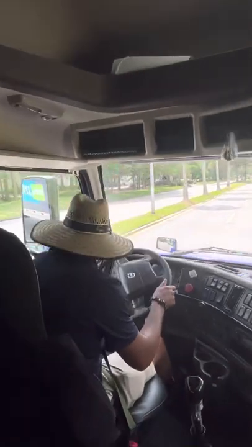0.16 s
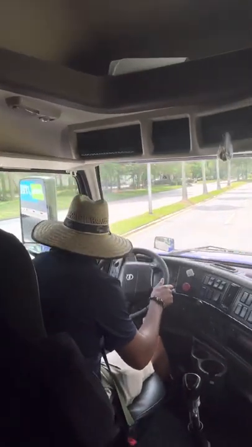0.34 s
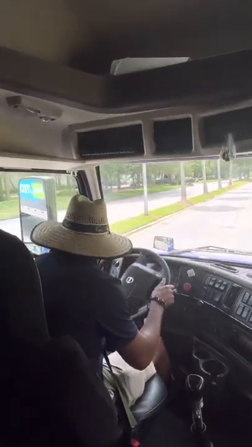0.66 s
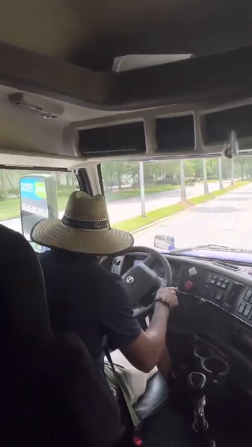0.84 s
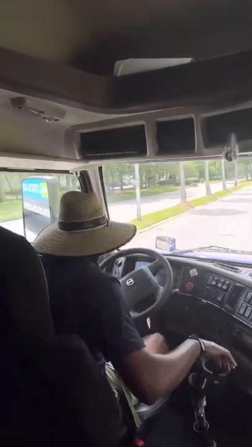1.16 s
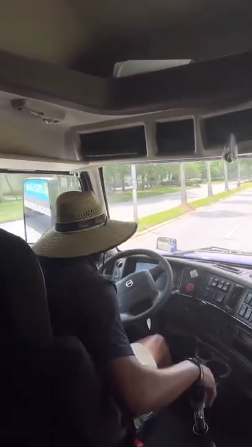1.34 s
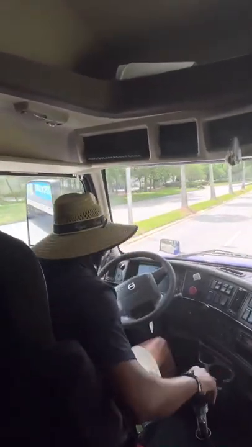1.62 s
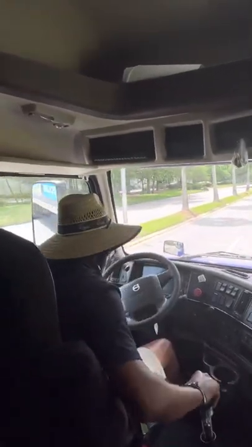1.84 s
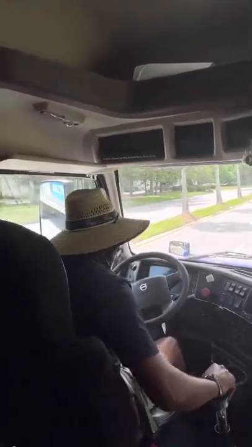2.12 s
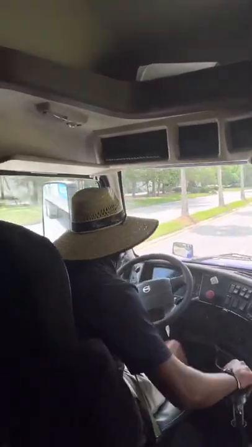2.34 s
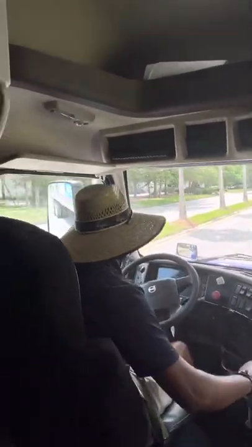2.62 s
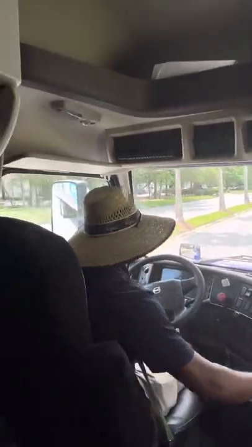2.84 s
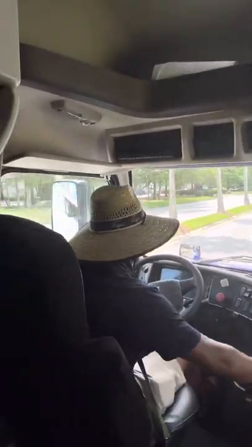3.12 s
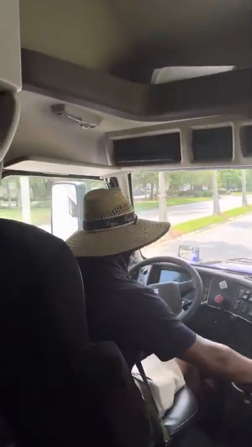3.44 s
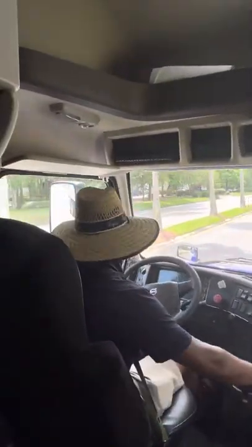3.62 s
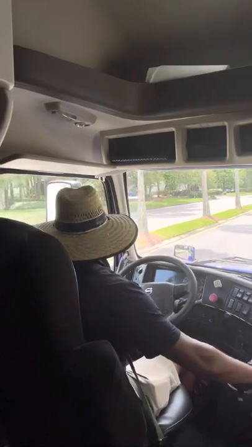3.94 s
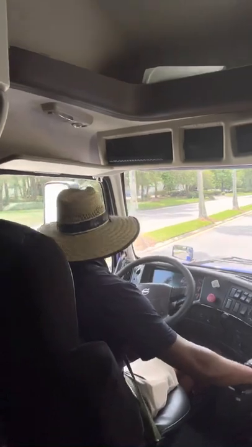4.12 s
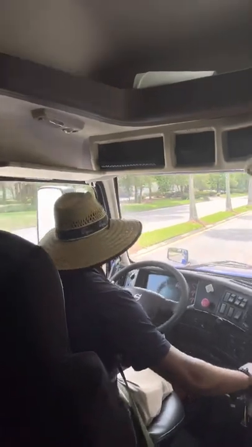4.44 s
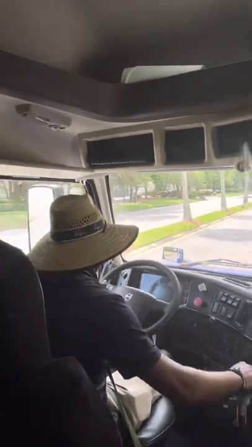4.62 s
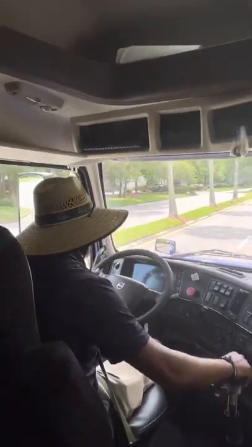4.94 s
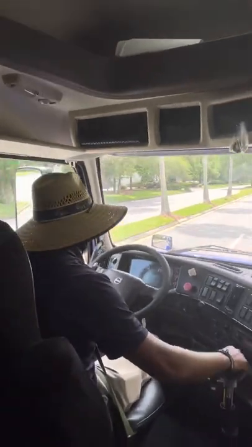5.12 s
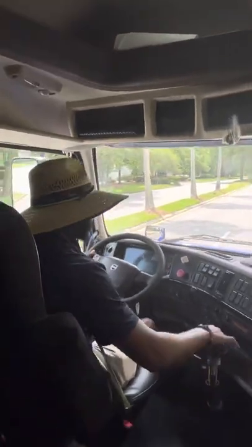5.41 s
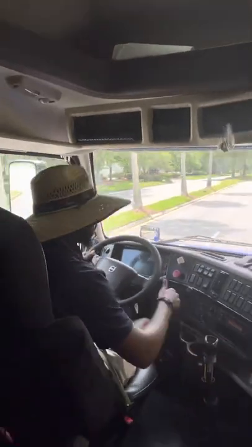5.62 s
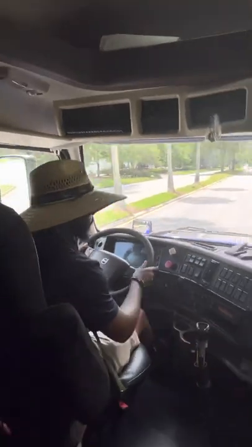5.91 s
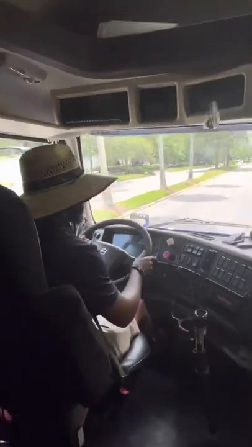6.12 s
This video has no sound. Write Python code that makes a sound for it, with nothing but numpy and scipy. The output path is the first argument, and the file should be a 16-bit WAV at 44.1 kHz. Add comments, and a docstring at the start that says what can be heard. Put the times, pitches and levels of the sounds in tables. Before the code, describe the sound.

Inside the cab of a slowly rolling heavy truck, heard from behind the driver's seat, a diesel engine drones and clatters. A turn indicator ticks lightly about three times a second throughout, over road rumble and faint blower hiss. For the first 2 seconds the engine pulls and rises gently in pitch, with thin gear whines. It then sinks, reaching idle around 3.5 seconds. The gear lever knocks dully at about 1.2, 1.5, 2.1 and 3 seconds, then several times between 3.8 and 4.5. Trim squeaks briefly at 2.6 and 3.7 seconds and rattles around 3, where keys clink faintly. From 5 seconds the engine picks up, the clutch biting with a low shudder near 5.4, with another small rattle and clink. The tyres hum on and off, and bumps make the cab boom softly, most clearly near 1, 2.9 and 5.3 seconds.

```python
"""Inside the cab of a slowly rolling heavy truck. The six-cylinder diesel pulls, drops to idle for a
gear change and picks up again as the clutch bites with a shudder. Its firings make a throbbing drone
and a clatter. Behind it the tyres hum, the cab booms over bumps, the blower hisses and the gears whine.
The turn indicator's relay ticks, the gear lever knocks, keys clink and the trim rattles and squeaks."""
import sys
import numpy as np
from scipy import signal
from scipy.fft import rfft, irfft, next_fast_len
from scipy.io import wavfile
from scipy.ndimage import uniform_filter1d, map_coordinates

SR = 44100
rng = np.random.default_rng(int(sys.argv[2]) if len(sys.argv) > 2 else 0)


def unload_audio(sound):
    """Save the sound as a 16-bit wav file, at the path given as the first command line argument."""
    columns = np.transpose(np.atleast_2d(sound))
    # keep every value between -1 and 1, then stretch to whole-number steps
    steps = np.round(np.clip(columns, -1, 1) * 32767)
    wavfile.write(sys.argv[1], SR, steps.astype(np.int16))


N = 276507

# "Mid" is what both ears share; "side" is how they differ, which makes a sound wide.
# How closely the side of a noise follows its mid: pitch_hz, share
EAR_LINK = [(40, 0.23), (130, 0.82), (300, 0.92), (600, 0.24), (2000, 0.27), (10000, 0.12)]

# Noise colours (how strong a noise is from low to high), each with: pitch_hz, level_db
HISS_MID = [(3800, -46), (4800, 3.5), (5600, 8.5), (6800, 6), (8000, 1), (9100, -2), (9600, -27.5),
            (10300, 4.5), (11200, 0.5), (11900, -25.5), (12800, -97)]  # air from the blower
HISS_SIDE = [(3800, -28), (4800, 4), (6000, -7), (7000, -1.5), (8500, 5), (9600, 3), (10600, 6.5),
             (11300, -18), (12000, -47)]
BOOM = [(22, -15), (35, -8.5), (55, 1), (80, 0.5), (120, -15), (220, -24.5)]  # the cab's deep boom
RUMBLE_MID = [(60, -33), (100, 4), (145, 2), (180, 0), (260, -1.5), (380, -9), (430, -14.5), (490, -13.5),
              (600, -42)]  # the cab shell shaking
RUMBLE_SIDE = [(50, -15), (100, 0.5), (145, 4.5), (200, 3), (300, 7.5), (420, -6), (600, -23), (900, -36)]
TRIM = [(150, -28), (300, 3), (480, -26), (1000, 4), (2200, 4), (3500, -13), (7000, -34)]  # the body of a rattle
SIZZLE = [(2000, -65), (4000, 8.5), (6500, 11.5), (9000, 5), (11500, 10), (12600, -11), (14000, -26)]  # the bright edge of a rattle or squeak
CLACK = [(1050, -19), (1300, -9.5), (2000, -8), (2700, 3), (3200, -9.5), (4400, 0.5), (4800, -21)]  # the relay's moving arm
GROWL = [(400, -11), (500, -1), (620, -4), (760, 2.5), (900, -22)]  # the engine under load
CLATTER_MID = [(280, 0.5), (450, -10), (530, 0), (630, -8), (700, -4.5), (790, -3.5), (910, 1.5),
               (1120, -2), (1380, -0.5), (1700, -2.5), (2050, -5), (2600, -7), (3200, -12.5), (4400, -15),
               (5000, -62)]  # burning fuel and valves
CLATTER_SIDE = [(280, -22), (430, 0), (540, -5), (660, -1.5), (730, -9), (900, -7), (1130, -11),
                (1400, -22.5), (1770, -18), (2200, -20), (2650, -16), (3200, -26), (4050, -27), (5000, -51)]

# Tyre hum: time_s, pitch_hz, level_db
TYRE_HUM = [(1.9, 138, -60), (2.2, 138, -41), (2.7, 138, -40), (2.85, 135, -32), (3.1, 136, -39),
            (3.3, 135, -56), (4.3, 132, -56), (4.5, 132, -43), (5.1, 133, -43), (5.45, 136, -39),
            (5.9, 141, -41), (6.27, 141, -50)]
# How rough the road is: time_s, roughness_db
ROUGHNESS = [(0, 14.5), (1.3, -15), (2.3, 1), (2.95, 4.5), (3.4, -3), (4.3, -10), (4.7, -5), (5.35, 1.5),
             (6.27, -4)]
# Bumps in the road: start_s, length_s, level_db
BUMPS = [(0.944, 0.11, -28.5), (1.13, 0.14, -36), (1.67, 0.17, -39), (2.093, 0.1, -31), (2.74, 0.34, -31),
         (4.121, 0.12, -31.5), (5.277, 0.21, -27.5), (5.65, 0.099, -29.5), (5.857, 0.075, -29)]
# Gear whines: start_s, end_s, pitch_hz, level_db, side_db, waver_rad
WHINES = [(0, .72, 545, -55, 6, 1), (0, .6, 885, -56, 6, .7), (0, .36, 1215, -58, 8, .6),
          (1.3, 2.95, 528, -59.5, 23, .2), (1.38, 1.8, 1435, -52, 2, 1.8),
          (1.678, 1.88, 1035, -53, 11, 1.8)]
# Trim squeaks: start_s, pitch_hz, length_s, relative_db, lowest_tone_db
SQUEAKS = [(2.626, 4640, 0.043, -36.5, -1), (2.668, 5620, 0.028, -38, -12), (3.622, 4560, 0.027, -48, -4),
           (3.688, 4610, 0.038, -40.5, -10)]
# A squeak's higher tones: pitch_multiple, level_db
SQUEAK_OVERTONES = [(2, -1.5), (3, -28)]
# Keys touching: start_s, level_db
CLINKS = [(3.047, -42), (3.071, -40), (5.339, -45), (5.574, -48)]
# The tones the keys ring with: pitch_hz, mid_db, side_db
KEY_TONES = [(5351, -4, -5), (6500, -5, -6), (7246, -5, -4), (10300, -2, -2), (11290, 0, 0),
             (11890, -6, -10)]
# Gear lever knocks, duller when the contact is soft: start_s, relative_db, cutoff_hz
KNOCKS = [(1.216, -17.5, 1100), (1.534, -19, 1000), (1.549, -19, 700), (1.562, -27, 330), (2.116, -19, 606),
          (2.145, -21, 450), (3.026, -20.5, 1000), (3.039, -17.5, 507), (3.849, -23.5, 586),
          (3.975, -22.5, 510), (4.169, -28.5, 495), (4.182, -21, 1190), (4.192, -23, 1200),
          (4.212, -20, 296), (4.471, -15.5, 610), (4.495, -20.5, 800)]
# Trim rattles: start_s, relative_body_db, relative_sizzle_db, fade_s
RATTLES = [(2.783, -24.5, -49, 0.12), (2.807, -25.5, -52, 0.046), (2.981, -36, -48, .07),
           (3.001, -26, -45, 0.07), (3.022, -19, -37.5, 0.1), (3.046, -23, -39.5, 0.17),
           (3.071, -27, -40, 0.13), (3.689, -32, -41.5, 0.036), (5.338, -39, -41, 0.051),
           (5.347, -32, -40, 0.1)]
# Resonances (pitches at which a thing likes to ring): pitch_hz, width_hz, level_db
LEVER = [(130, 55, 4), (205, 76, 2), (314, 85, 0), (494, 194, -8), (720, 300, -13)]  # the gear lever
PANEL = [(467, 69, -4.5), (552, 54, -6.5), (690, 33, -14), (1013, 96, -7.5)]  # a hollow panel behind the trim
# The tones of the indicator relay: pitch_hz, mid_db, side_db
RELAY_CLOSING = [(1300, -27, -29), (1920, -28, -31), (2320, -35, -32), (2410, -35, -29), (2640, -35, -31),
                 (3660, -43, -40), (4205, -39, -40), (4280, -37.5, -38.5)]
RELAY_OPENING = [(2290, -35.5, -29), (2400, -32, -33.5), (2485, -33.5, -28), (2710, -33, -29.5),
                 (2890, -33.5, -31.5), (3620, -41.5, -40.5), (4200, -40.5, -45), (4570, -58, -47),
                 (5000, -58, -47)]
# The relay arm's hit and rebound: delay_s, level_db
BOUNCES = [(0, 0), (.013, -5)]

# Engine speed, where six firings make one cycle: time_s, firing_hz
ENGINE_SPEED = [(0, 68.3), (.4, 69.3), (.8, 75), (1.25, 78.6), (1.85, 83.3), (2.03, 83.3), (2.4, 67.5),
                (3, 47.5), (3.35, 39.5), (3.75, 35), (4.45, 39.7), (5.05, 39.7), (5.25, 56.5), (5.55, 55),
                (5.95, 63.5), (6.27, 66)]
# How hard the engine works: time_s, effort_db
EFFORT = [(0, 1), (.35, -3.5), (.7, -1), (1.95, -1.5), (2.5, -7.5), (2.95, -3.5), (3.3, -18.5), (4.3, -12),
          (5.05, -4.5), (5.5, -7.5), (6.27, -8.5)]
# The firing note and the note a fifth above it: time_s, level_db
FIRING_LEVEL = [(0, -49), (2.7, -49), (3.1, -42), (3.6, -46), (4.3, -43), (4.7, -57), (5.25, -56),
                (5.6, -41), (5.85, -39), (6.27, -54)]
FIFTH_LEVEL = [(0, -45), (.7, -47), (1.3, -39), (1.92, -33), (2.15, -43), (2.42, -37), (2.8, -43),
               (3.3, -58), (5.4, -54), (5.8, -44), (6.27, -45)]
# The exhaust's low tones, the sixth multiple being the firing rate: cycle_multiple, relative_db
EXHAUST_TONES = [(8, -5), (10, 0), (11, -4), (12, 0), (13, -3)]
# How loud an exhaust tone is as it slides through the cab's resonances: pitch_hz, level_db
CAB_RESPONSE = [(45, -58), (56, -46), (70, -48), (80, -40), (100, -42), (112, -44), (126, -38), (138, -37),
                (148, -34), (156, -42), (166, -49), (225, -47), (330, -59)]


def amp(db):
    """Turn decibels into a number to multiply by."""
    return 10 ** (np.asarray(db) / 20)


def unit(x):
    """Scale a sound to an average strength (rms) of 1."""
    return x / np.sqrt(np.mean(x ** 2) + 1e-20)


def along(points, hz):
    """Read between a table's rows on a musical (log) pitch scale."""
    pitches, values = np.transpose(points)
    return np.interp(np.log(hz + 1), np.log(pitches + 1), values)


def colour(points):
    """A filter that follows a noise colour and falls steeply beyond its ends."""
    def gain(hz):
        low_cut = np.minimum(hz / points[0][0], 1) ** 2
        return amp(along(points, hz)) * low_cut / np.maximum(hz / points[-1][0], 1) ** 6
    return gain


def body(resonances, cutoff_hz):
    """A filter for a ringing object, hit softly enough to lose the treble above cutoff_hz."""
    def gain(hz):
        peaks = sum((-1) ** k * amp(db) * 1j * hz * width / (pitch ** 2 - hz ** 2 + 1j * hz * width)
                    for k, (pitch, width, db) in enumerate(resonances))
        return peaks / (1 + (hz / cutoff_hz) ** 6)
    return gain


def curves(rows):
    """Turn each column after the time into one value per sample."""
    times, *columns = np.transpose(rows)
    return [np.interp(np.arange(N) / SR, times, column) for column in columns]


def wobble(rate):
    """A smooth random curve through `rate` points a second."""
    return map_coordinates(rng.standard_normal(int(N * rate / SR) + 4), [np.arange(N) * rate / SR])


def arch(start_s, length_s):
    """One smooth swell and fade."""
    return np.sin(np.pi * np.clip((np.arange(N) / SR - start_s) / length_s, 0, 1))


def octaves():
    """Engine speed in octaves above 50 firings a second."""
    firing_hz, = curves(ENGINE_SPEED)
    return np.log2(firing_hz / 50)


def filtered(x, response):
    """Pass a sound through a filter, given as a gain for each frequency."""
    n = x.shape[-1]
    padded = next_fast_len(n + SR // 4)
    return irfft(rfft(x, padded) * response(np.fft.rfftfreq(padded, 1 / SR)), padded)[..., :n]


def add(track, start_s, sound):
    """Mix a sound into a track."""
    part = track[..., max(round(start_s * SR), 0):][..., :sound.shape[-1]]
    part += sound[..., :part.shape[-1]]


def ears(mid, side):
    """Make left and right from mid and side."""
    return np.array([mid + side, mid - side])


def patchy(x, depth_db):
    """Give a sound brief swells and dips that differ from low to high."""
    bands = signal.stft(x, nperseg=1024)[2]
    swells = uniform_filter1d(rng.standard_normal(bands.shape[1:]), size=3, axis=0)
    swells = unit(uniform_filter1d(swells, size=6, axis=1))
    return unit(signal.istft(bands * amp(depth_db * swells), nperseg=1024)[1][:, :N])


def rush(mid_colour, side_colour, side_db, patchy_db, lag=2.22):
    """Noise in the cab; its low end reaches the right ear earlier and louder."""
    mid, other = patchy(rng.standard_normal((2, N)), patchy_db)
    link = lambda hz: np.clip(along(EAR_LINK, hz), 0, 1)
    linked = filtered(mid, lambda hz: link(hz) * np.exp(-1j * lag))
    free = filtered(other, lambda hz: np.sqrt(1 - link(hz) ** 2))
    side = unit(filtered(linked + free, colour(side_colour)))
    return ears(unit(filtered(mid, colour(mid_colour))), amp(side_db) * side)


def tone(phase, side_db, lag=2.17):
    """A pure tone standing between the cab walls, different at each ear."""
    return np.sqrt(2) * ears(np.sin(phase), amp(side_db) * np.sin(phase - lag))


def whine(hz, side_db, waver):
    """A thin, slightly unsteady tone."""
    flutter = amp(2.5 * wobble(18))
    phase = 2 * np.pi * hz * np.arange(N) / SR + waver * wobble(22)
    return flutter * tone(phase, side_db, lag=np.pi / 2)


def burst(response, fade_s, rise_s, side_db, direct=0):
    """A filtered hit whose echoes off the cab walls fall 60 dB in fade_s."""
    t = np.arange(SR // 3) / SR
    echoes = rng.standard_normal((2, len(t))) * amp(-60 * t / fade_s) * (1 - np.exp(-t / rise_s))
    echoes[:, SR // 1000] += direct * np.linalg.norm(echoes[0])  # the hit itself
    rung = filtered(echoes, response) * signal.windows.tukey(len(t), .006)
    mid, side = rung / np.sqrt(np.mean(rung[:, :SR // 50] ** 2, axis=1, keepdims=True))
    return ears(mid, amp(side_db) * side)


def ring(tones, fade_s, rise_s, phases):
    """Tones that die away after a hit; each hit sets them off a little differently."""
    t = np.arange(SR // 5) / SR
    hz, *levels = np.transpose(tones)
    gains = amp(np.array(levels) + rng.standard_normal(len(hz)))
    waves = np.sin(2 * np.pi * hz[:, None] * t + phases[..., None])
    mid, side = (gains[..., None] * waves).sum(axis=1)
    return ears(mid, side) * amp(-60 * t / fade_s) * (1 - np.exp(-t / rise_s))


def blower():
    """The fan makes a thin tone and a hiss that grows a little with engine speed."""
    hiss = amp(-54 + 1.36 * octaves()) * rush(HISS_MID, HISS_SIDE, side_db=2, patchy_db=2.5)
    return hiss + amp(-64) * whine(hz=1365, side_db=13, waver=.88)


def road():
    """The tyres hum unsteadily; the cab shell rumbles with the road and booms over bumps."""
    rough_db, = curves(ROUGHNESS)
    tyre_hz, hum_db = curves(TYRE_HUM)
    phase = 2 * np.pi * np.cumsum(tyre_hz * (1 + .012 * wobble(12))) / SR
    hum = amp(hum_db + 2.5 * wobble(18)) * tone(phase, side_db=-1.5)
    jolt = sum(amp(db) * arch(start_s, length_s) for start_s, length_s, db in BUMPS)
    boom = np.hypot(amp(-41.5), jolt) * rush(BOOM, BOOM, side_db=-6, patchy_db=-1, lag=1.3)
    shake = np.hypot(amp(-38 + .37 * rough_db), amp(-8.5) * jolt)
    rumble = shake * rush(RUMBLE_MID, RUMBLE_SIDE, side_db=1, patchy_db=3.5)
    return hum + boom + rumble


def gears():
    """The gears sing thin tones that swell and fade as their load changes."""
    t = np.arange(N) / SR
    out = np.zeros((2, N))
    for start_s, end_s, hz, db, side_db, waver in WHINES:
        ramp_s = .046 * (end_s - start_s)
        swell = np.clip(np.minimum(t - start_s, end_s - t) / ramp_s, 0, 1)
        out += amp(db) * swell * whine(hz, side_db, waver)
    return out


def squeaks():
    """Plastic rubs on plastic in short, bright chirps of jittery pitch."""
    out = np.zeros((2, N))
    for start_s, hz, length_s, db, lowest_db in SQUEAKS:
        progress = np.linspace(0, 1, int(length_s * SR))
        jitter = .024 * np.interp(progress, np.linspace(0, 1, 70), rng.standard_normal(70))
        phase = 2 * np.pi * np.cumsum(hz * (1 + jitter)) / SR
        tones = [(1, lowest_db)] + SQUEAK_OVERTONES
        chirp = sum(amp(level) * tone(round(k) * phase, side_db=9) for k, level in tones)
        scrape = amp(-12) * unit(filtered(rng.standard_normal((2, len(progress))), colour(SIZZLE)))
        swell = np.sin(np.pi * np.sqrt(progress))
        add(out, start_s, amp(db - 9.5) * swell * (chirp + scrape))
    return out


def keys():
    """Hanging keys touch and give short, bright rings."""
    out = np.zeros((2, N))
    for start_s, db in CLINKS:
        phases = rng.uniform(0, 2 * np.pi, (2, len(KEY_TONES)))
        add(out, start_s, amp(db) * ring(KEY_TONES, fade_s=.053, rise_s=.00069, phases=phases))
    return out


def rattles():
    """Loose trim rattles with a bright sizzle and shakes a hollow panel."""
    out = np.zeros((2, N))
    for start_s, body_db, sizzle_db, fade_s in RATTLES:
        trim = amp(body_db - 20) * burst(colour(TRIM), fade_s, rise_s=.002, side_db=2)
        panel = amp(body_db - 17) * burst(body(PANEL, cutoff_hz=1500), fade_s, rise_s=.002, side_db=10.5)
        sizzle = amp(sizzle_db - 8) * burst(colour(SIZZLE), fade_s, rise_s=.002, side_db=-1)
        add(out, start_s, trim + panel + sizzle)
    return out


def gear_lever():
    """Each contact makes the lever ring briefly with a dull knock."""
    out = np.zeros((2, N))
    for start_s, db, cutoff_hz in KNOCKS:
        knock = burst(body(LEVER, cutoff_hz), fade_s=.055, rise_s=.00061, side_db=-48, direct=.31)
        add(out, start_s, amp(db - 10.5) * knock)
    return out


def indicator(beat_s=.6):
    """A relay (an electric switch) closes and opens in time; it rings as its arm clacks and rebounds."""
    out = np.zeros((2, N))
    for tones, first_s in [(RELAY_CLOSING, .296), (RELAY_OPENING, .581)]:
        phases = rng.uniform(0, 2 * np.pi, (2, len(tones)))
        for start_s in np.arange(first_s, N / SR, beat_s):
            add(out, start_s, ring(tones, fade_s=.042, rise_s=.0026, phases=phases))
            for delay_s, db in BOUNCES:
                clack = burst(colour(CLACK), fade_s=.05, rise_s=.0015, side_db=1)
                add(out, start_s + delay_s, amp(db - 48.5) * clack)
    return out


def clutch_shudder(phase):
    """The biting clutch shakes the cab at multiples of the crankshaft's turning rate."""
    crank = phase / 3  # three firings per turn
    shake = sum(amp(-30.5 - 3 * k) * tone((k + 3) * crank, side_db=-6) for k in range(4))
    return arch(start_s=5.32, length_s=.27) * shake


def valves(cycles, side_db, size=4096):
    """The same jumble of tiny hits repeats every engine cycle, so its pitch follows the speed."""
    position = [cycles % 1 * size]
    mid, side = (map_coordinates(rng.standard_normal(size), position, mode="grid-wrap") for _ in range(2))
    mid = unit(filtered(mid, colour(CLATTER_MID)))
    side = unit(filtered(side, colour(CLATTER_SIDE)))
    return ears(mid, amp(side_db) * side)


def clatter(firings, side_db=9.5):
    """Firings make the noise of burning fuel and valves pulse, each cylinder at its own strength."""
    cylinder_db = 2.5 * unit(rng.standard_normal(6))[firings.astype(int) % 6]
    pulses = amp(cylinder_db) * np.exp(-(firings % 1) / 1.1)
    chop = unit(uniform_filter1d(1 + .082 * pulses, size=48))
    burning = np.sqrt(.6) * rush(CLATTER_MID, CLATTER_SIDE, side_db, patchy_db=3.7)
    tapping = np.sqrt(.4) * valves(firings / 6, side_db)
    return chop * amp(.6 * wobble(14)) * (burning + tapping)


def uneven_cylinders(phase):
    """Unequal cylinders add weak, unsteady tones at multiples of half the firing rate."""
    return sum(amp(3 * wobble(12)) * tone(k * phase / 2 + 1.8 * wobble(16), side_db=2) / k
               for k in range(6, 14))


def exhaust(phase, firing_hz):
    """One cylinder thumps hardest: once a cycle the tones roughly line up and the cab throbs."""
    def harmonic(k):
        level_db = along(CAB_RESPONSE, k * firing_hz / 6) + 1.5 * wobble(7)
        return amp(level_db) * tone(k * phase / 6 + .55 * wobble(9), side_db=-4.5)
    upper = amp(-9) * sum(harmonic(k) for k in range(14, 25))
    return upper + sum(amp(db) * harmonic(round(k)) for k, db in EXHAUST_TONES)


def firing_notes(phase):
    """The firing note, and a fifth above it because the engine's two halves pull unevenly."""
    firing_db, = curves(FIRING_LEVEL)
    fifth_db, = curves(FIFTH_LEVEL)
    return amp(firing_db) * tone(phase, side_db=-12) + amp(fifth_db) * tone(1.5 * phase, side_db=-4.5)


def engine(first_throb_s=.022):
    """The diesel's firings make a drone, a growl and a clatter that grows with speed and effort."""
    firing_hz, = curves(ENGINE_SPEED)
    effort_db, = curves(EFFORT)
    firings = np.cumsum(firing_hz * (1 + .003 * wobble(12))) / SR  # running count
    phase = 2 * np.pi * (firings - firings[round(first_throb_s * SR)])
    sway = amp(1.5 * wobble(8))
    throb = amp(effort_db) * exhaust(phase, firing_hz)
    drone = sway * (firing_notes(phase) + throb + clutch_shudder(phase))
    growl = amp(effort_db - 55.5) * rush(GROWL, GROWL, side_db=12, patchy_db=8)
    overtones = amp(effort_db + 6) * uneven_cylinders(phase)
    clatter_db = -44.5 + 2 * octaves() + .18 * effort_db
    return drone + growl + amp(clatter_db) * (clatter(firings) + overtones)


def scene():
    """Everything heard from behind the driver's seat."""
    driving = engine() + road() + gears() + blower()
    return driving + indicator() + gear_lever() + rattles() + keys() + squeaks()


def record(dry, top_hz=14300):
    """Cut away the very highest treble."""
    return filtered(dry, lambda hz: hz < top_hz)


dry = scene()
out = record(dry)
unload_audio(out)
```